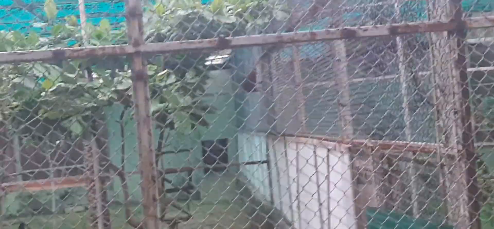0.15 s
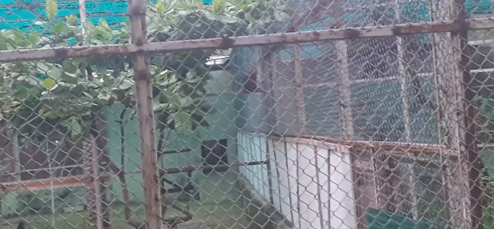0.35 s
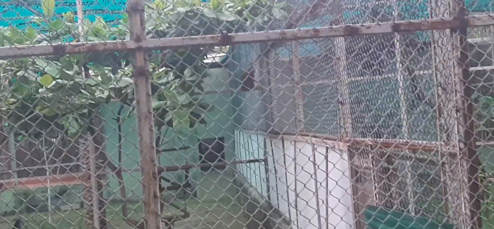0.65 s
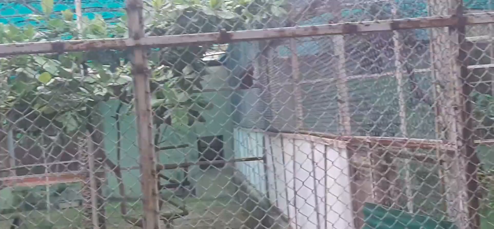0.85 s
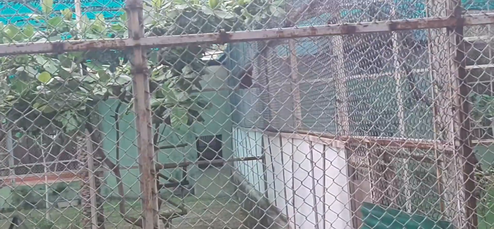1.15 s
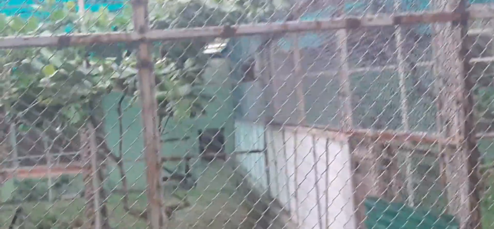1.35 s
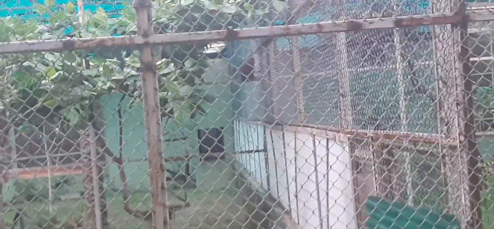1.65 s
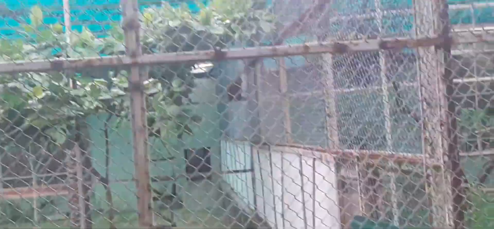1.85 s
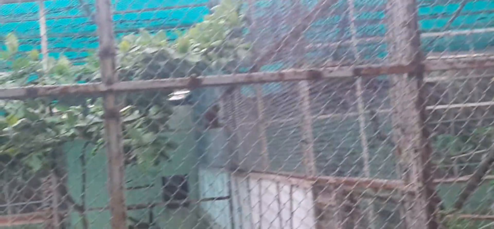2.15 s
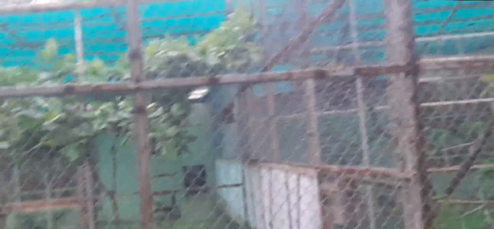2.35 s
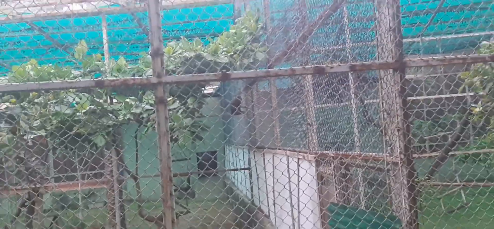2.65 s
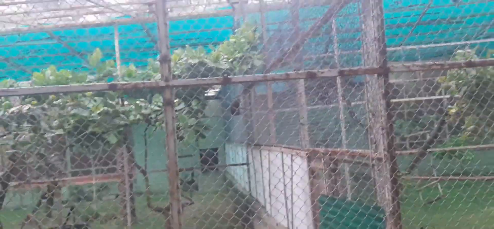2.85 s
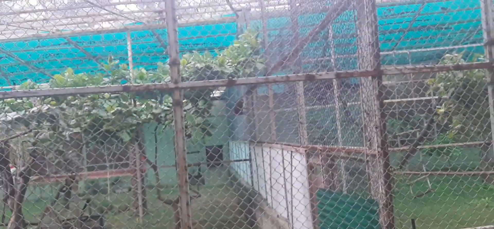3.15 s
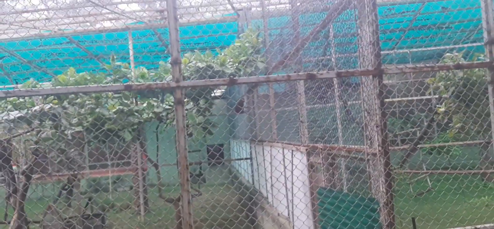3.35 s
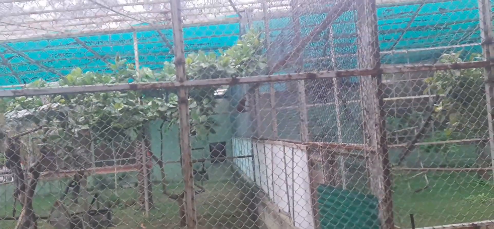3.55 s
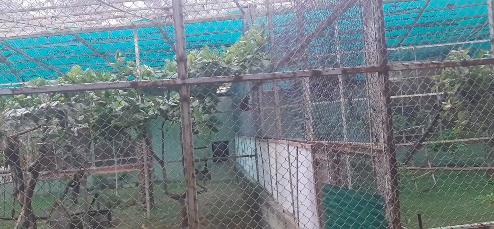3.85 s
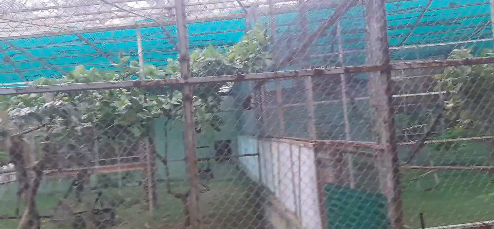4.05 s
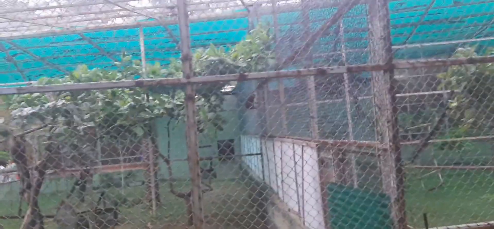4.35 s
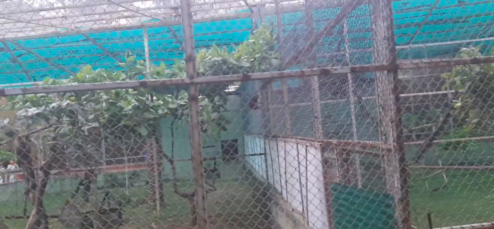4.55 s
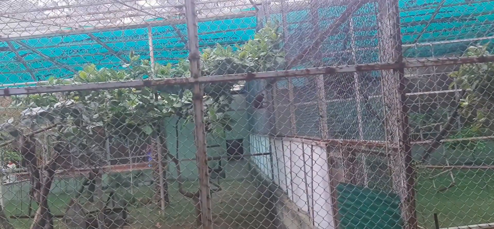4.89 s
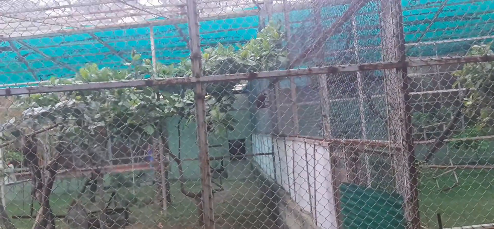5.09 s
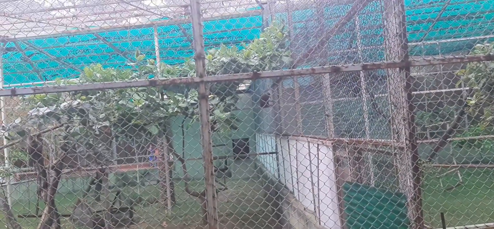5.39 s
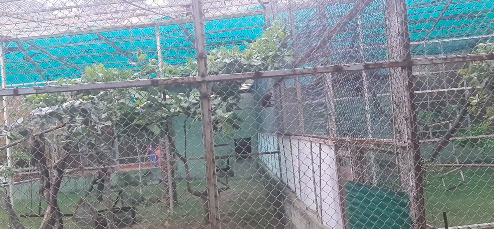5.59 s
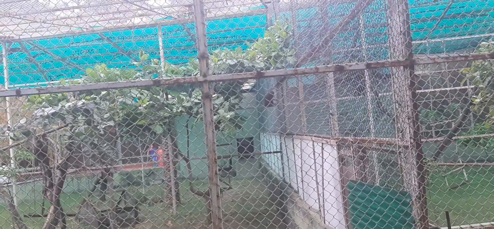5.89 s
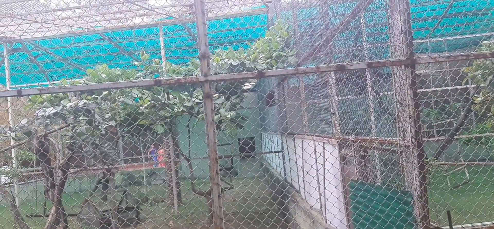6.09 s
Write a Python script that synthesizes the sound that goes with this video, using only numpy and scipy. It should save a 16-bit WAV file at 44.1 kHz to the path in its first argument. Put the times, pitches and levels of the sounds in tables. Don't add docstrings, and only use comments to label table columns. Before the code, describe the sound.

A peafowl close to the microphone in an open wire aviary honks immediately and again soon after, then twice quickly, once more alone, and after a pause in a tight cluster with a last high honk. Between them a neighbour clucks softly, far fowl call faintly, the mesh ticks, leaves rustle and distant traffic hums. The sound is wide, fluttery and slightly smeared.

```python
import sys
import numpy as np
from scipy import signal
from scipy.fft import rfft, irfft
from scipy.io import wavfile
from scipy.ndimage import uniform_filter1d, map_coordinates

SR = 44100
rng = np.random.default_rng(int(sys.argv[2]) if len(sys.argv) > 2 else 0)


def nominal_scale(level):
    x = np.asarray(level, float) / 20
    return 10 ** x


def to_wav(s):
    ch = np.atleast_2d(s).T
    pcm = np.round(np.clip(ch, -1, 1) * 32767)
    wavfile.write(sys.argv[1], SR, pcm.astype(np.int16))


N = 274610


def rms_one(x):
    return x / np.sqrt(np.mean(x ** 2) + 1e-20)


def at_hz(points, hz):
    point_hz, point_db = np.transpose(points)
    return np.interp(np.log(hz), np.log(point_hz), point_db)


def drift(rate_hz, size):
    r = np.exp(-2 * np.pi * rate_hz / SR)
    settle = 9000
    noise = rng.standard_normal(size + settle)
    return rms_one(signal.lfilter([1], [1, -2 * r, r * r], noise)[settle:])


def band(x, low_hz, high_hz):
    return signal.sosfilt(signal.butter(2, [low_hz, high_hz], "band", fs=SR, output="sos"), x)


def coloured(spectrum):
    hz = np.arange(1, N // 2 + 2) * SR / N
    return rms_one(irfft(rfft(rng.standard_normal(N)) * nominal_scale(at_hz(spectrum, hz)), N))


def add(track, s, sound):
    at = max(round(s * SR), 0)
    track[at:at + len(sound)] += sound[:N - at]


def swells(rows, rise_db_per_s, fall_db_per_s, floor_db):
    s, peak_db = np.transpose(rows)[:, :, None]
    hop = 64
    late = np.arange(0, N, hop) / SR - s
    drop_db = np.where(late < 0, -rise_db_per_s, fall_db_per_s) * late
    power = np.sum(nominal_scale(peak_db - drop_db) ** 2, axis=0) + nominal_scale(floor_db) ** 2
    return np.interp(np.arange(N) / hop, np.arange(len(power)), 10 * np.log10(power))


# (frequency [Hz], density [dB per Hz])
AIR_SPECTRUM = [(15, -36.5), (25, -21.5), (102, -2), (152, -15), (351, -13), (512, -12.5), (556, -23),
                (619, -15), (1390, -30), (2200, -24.5), (3670, -37), (4550, -34), (15700, -55.5)]


def air():
    return nominal_scale(-56.5) * coloured(AIR_SPECTRUM)


# (time [s], peak level [dB])
HEAVY_ENGINES = [
    (0.0, -56),
    (2.4, -54),
    (4.4, -52.5),
    (6.1, -56.5),
]


def rumble():
    level_db = swells(HEAVY_ENGINES, rise_db_per_s=7, fall_db_per_s=7, floor_db=-60)
    lumps_db = 2.5 * drift(4, N)
    return nominal_scale(level_db + lumps_db) * rms_one(band(rng.standard_normal(N), 59, 173.3))


# (time [s], peak level [dB])
ROAD_PASSES = [
    (0.0, -47.5),
    (1.5, -56),
    (2.8, -60.5),
    (4.1, -62.5),
    (6.0, -56),
]


def traffic():
    level_db = swells(ROAD_PASSES, rise_db_per_s=31.5, fall_db_per_s=28.5, floor_db=-66.5)
    return nominal_scale(level_db) * rms_one(band(rng.standard_normal(N), 430, 1840))


# (time [s], peak level [dB])
BRIGHT_SWELLS = [(0.0, -38.5), (1.03, -55.5), (1.65, -62), (2.12, -63), (2.78, -60.5), (3.3, -69.5),
                 (3.68, -70), (4.2, -56), (4.9, -57.5), (5.35, -55.5), (6.0, -55)]
STILL_DB = -72.5


def bright_swell_db():
    return swells(BRIGHT_SWELLS, rise_db_per_s=35.5, fall_db_per_s=48, floor_db=STILL_DB)


def bright_noise():
    level_db = bright_swell_db() + 0.9 * drift(6.2, N)
    return nominal_scale(level_db) * rms_one(band(rng.standard_normal((2, N)), 2000, 7650))


def glides(table, wobble, rate_hz):
    out = np.zeros(N)
    for s, length_s, start_hz, end_hz, level_db in table:
        n = round(length_s * SR)
        hz = np.linspace(start_hz, end_hz, n) * (1 + wobble * drift(rate_hz, n))
        tone = np.sin(2 * np.pi * np.cumsum(hz) / SR)
        level = nominal_scale(level_db + 8.5 + 4.8 * drift(20, n))
        add(out, s, level * signal.windows.tukey(n, 0.4) * tone)
    return out


# (time [s], length [s], start [Hz], end [Hz], level [dB])
DISTANT_CALLS = [
    (2.8, 0.28, 642.5, 621, -67),
    (2.96, 0.1, 872, 800, -58.5),
    (5.8, 0.31, 1059, 945, -60),
]


def blurred_calls():
    return glides(DISTANT_CALLS, wobble=0.0686, rate_hz=130)


# (time [s], length [s], start [Hz], end [Hz], level [dB])
BIRD_WHISTLES = [
    (1.15, 0.34, 5100, 4200, -71),
    (2.9, 0.55, 7500, 5830, -67),
]


def whistles():
    return glides(BIRD_WHISTLES, wobble=0.055, rate_hz=150)


# (time [s], length [s], start [Hz], end [Hz], level [dB])
SOFT_CALLS = [
    (1.36, 0.037, 624, 590, -56),
    (3.29, 0.071, 452, 427, -55),
    (4.03, 0.07, 432, 437, -55),
    (4.1, 0.07, 481, 528, -43),
    (4.44, .12, 922, 1015, -37),
]


def far_calls():
    return glides(SOFT_CALLS, wobble=0.012, rate_hz=210)


# (time [s], peak level [dB])
MESH_TICKS = [
    (0.956, -42),
    (2.913, -54),
    (3.646, -41),
    (4.195, -53),
    (4.629, -24.5),
    (5.197, -24),
    (6.157, -45.5),
]


def ticks():
    out, t = np.zeros(N), np.arange(SR // 20) / SR
    for s, peak_db in MESH_TICKS:
        snap = band(rng.standard_normal(len(t)), 8000, 17000)
        add(out, s - 0.002, nominal_scale(peak_db + 1.0 - 60 * t / 0.039) * snap)
    return out


# (time [s], peak level [dB], top resonance against the lowest [dB])
NEIGHBOUR_CLUCKS = [(0.4597, -41.5, -10), (1.5194, -77.5, 15), (2.9001, -50, -3.5), (2.9586, -36, -18.5),
                    (3.372, -38.5, -8), (3.6376, -34.5, -2.5), (3.7625, -38, -12), (3.8919, -34.5, -2),
                    (4.0985, -29.5, -37.5), (4.8491, -39.5, -6), (5.344, -42, -4), (5.7337, -44.5, -7),
                    (5.9687, -43, -1.5)]
# (frequency [Hz], width [Hz], level [dB])
CLUCK_RESONANCES = [(3180, 230, -4.5), (4820, 400, -4.5), (6530, 180, 0.5)]


def clucks():
    out, t = np.zeros(N), np.arange(SR // 3) / SR
    decay = nominal_scale(-60 * t / 0.22) + nominal_scale(-3.0 - 60 * t / 0.76)
    shape = np.minimum(t / 0.0054, 1) * decay
    for s, peak_db, tilt_db in NEIGHBOUR_CLUCKS:
        puff = rng.standard_normal(len(t))
        sound = nominal_scale(4.5 + tilt_db / 2) * band(puff, 3360, 7900)
        for k, (hz, width_hz, level_db) in enumerate(CLUCK_RESONANCES):
            ring = rms_one(band(puff, hz - width_hz / 2, hz + width_hz / 2))
            sound = sound + nominal_scale(level_db + tilt_db * k / 2) * ring
        add(out, s, nominal_scale(peak_db - 11.5) * shape * sound)
    return out


def honk_shape(length_s, climb_s, first_hz, top_hz):
    t = np.arange(round(length_s * SR)) / SR
    left_s = length_s - t
    close_s = min(0.08, 0.4295 * length_s)
    slack = np.clip(1 - t / climb_s, 0, 1) ** 1.4
    shut = np.clip(1 - left_s / close_s, 0, 1)

    hz = top_hz + (first_hz - top_hz) * slack
    hz = hz + (690 - hz) * np.minimum(1.5 * shut, 1)

    attack_db = -31.5
    opening_db = attack_db * np.clip(1 - t / 0.029, 0, 1)
    low_db = attack_db * np.clip(1 - t / 0.016, 0, 1)
    low_db = low_db - 4.5 * (1 - slack) * (1 - shut)
    low_db = low_db - 30.5 * np.clip(1 - left_s / 0.024, 0, 1)
    swell_db = 5.5 + 7 * max(top_hz - first_hz, 0) / 100
    high_db = opening_db - swell_db * slack - 48 * shut ** 1.36
    stopped = np.clip((shut - 0.3) * close_s / 0.039, 0, 1)
    breath_db = opening_db - 2 * slack - 20 * stopped
    return t, hz, low_db, high_db, breath_db


# (time [s], length [s], first pitch [Hz], top pitch [Hz], overtones at full effort [dB])
PEAFOWL_HONKS = [
    (0.0, 0.31, 755, 808.8, -17),
    (0.697, 0.29, 706.5, 828.5, -17),
    (1.626, 0.18, 690, 775.6, -24),
    (1.83, .27, 782, 815, -18.5),
    (2.465, .29, 690, 828.4, -17.5),
    (4.186, .125, 705, 789, -32.5),
    (4.286, 0.172, 622, 703.4, -17),
    (4.449, 0.26, 831.5, 809.7, -16.5),
    (4.968, .27, 675, 877.4, -18),
]
# (fundamental [dB], second partial against the throat [dB], breath [dB],
# thin top of the breath [dB], time to full effort [s])
HONK_BEARING = [(-26.5, 4, -32, -12.5, 0.083), (-30.5, -3.5, -32, -5.5, .19),
                (-23.5, 6.5, -31, -26.5, 0.089), (-23.5, 11.5, -28.5, -43.5, .16),
                (-29.5, 1, -30.5, -25, .21), (-27.5, 7.5, -50.5, -17, 0.087), (-21, 7, -30.5, -23, .08),
                (-28, 8.5, -30.5, -19, 0.12), (-28, 13, -32, -27, .15)]
# (frequency [Hz], level [dB])
THROAT_SPECTRUM = [(1200, -16.5), (1700, -15.5), (2400, -1), (3200, 9.5), (3800, 1), (4300, -11.5),
                   (5000, -6), (5700, -22), (7500, -24.5), (9000, -41)]
# (frequency [Hz], density [dB per Hz])
BREATH_SPECTRUM = [(3500, -29.5), (4700, -12.5), (6000, -4), (7600, -14.5), (8400, -36), (11300, -45.5),
                   (12500, -20.5), (16000, -22.5)]


def honks():
    out, breath = np.zeros((2, N)), coloured(BREATH_SPECTRUM)
    rasp = band(coloured(THROAT_SPECTRUM), 2200, 6000)
    thin = rms_one(band(band(rng.standard_normal(N), 9100, 10000), 9100, 10000))
    pan = nominal_scale(np.array([[-0.75], [0.75]]))
    k = np.arange(2, 14)[:, None]
    for honk, bearing in zip(PEAFOWL_HONKS, HONK_BEARING):
        s, length_s, first_hz, top_hz, full_db = honk
        tone_db, second_db, air_db, thin_db, climb_s = bearing
        t, hz, low_db, high_db, breath_db = honk_shape(length_s, climb_s, first_hz, top_hz)
        n = len(t)
        at = max(round(s * SR), 0)
        span = slice(at, at + n)

        jitter = 0.0057 * drift(90, SR // 2)[:n]
        phase = 2 * np.pi * np.cumsum(hz * (1 + jitter)) / SR
        pulsed = 1 + 0.29 * np.cos(phase)

        weight = nominal_scale(at_hz(THROAT_SPECTRUM, k * hz) + second_db * (k == 2))
        weight /= np.sqrt(np.sum(weight ** 2, axis=0) / 2)
        shimmer = nominal_scale(3.0 * np.array([drift(50, SR // 2)[:n] for _ in k]))
        partials = np.sin(k * phase + rng.uniform(0, 2 * np.pi, k.shape))
        overtones = np.sum(weight * shimmer * partials, axis=0)

        waver_db = 2.0 * drift(6.7, SR // 2)[:n]
        fundamental = nominal_scale(tone_db + low_db + waver_db) * np.sin(phase)
        breathing = pulsed * (breath[span] + nominal_scale(thin_db) * thin[span])
        plain = fundamental + nominal_scale(air_db + breath_db - 4.0) * breathing
        bright = nominal_scale(full_db + high_db) * (overtones + nominal_scale(-22) * pulsed * rasp[span])
        edge = np.clip(np.minimum(t, length_s - t) / 0.031, 0, 1)
        out[:, span] += edge * (plain + pan * bright)
    return out


def yard(x):
    t60_s = 0.44
    t = np.arange(round(t60_s * SR)) / SR
    build_up = np.clip(t / 0.03, 0, 1)
    tail = band(rng.standard_normal(len(t)), 330, 9000) * nominal_scale(-60 * t / t60_s) * build_up
    tail = tail / np.sqrt(np.sum(tail ** 2))
    slap = np.zeros(N)
    add(slap, 0.11, nominal_scale(-29.0) * band(x, 4000, 14000))
    return nominal_scale(-27.5) * signal.fftconvolve(x, tail)[:N] + slap


def scene():
    background = air() + rumble() + traffic() + bright_noise()
    others = blurred_calls() + whistles() + far_calls() + clucks()
    bird = honks()
    return background + ticks() + others + bird + yard(bird.mean(axis=0) + others)


def flutter(dry):
    flutter_hz, depth = 20, 0.0952
    t = np.arange(N) / SR
    bent = t + depth / (2 * np.pi * flutter_hz) * np.sin(2 * np.pi * flutter_hz * t)
    return np.array([map_coordinates(c, [bent * SR], order=3, mode="mirror") for c in dry])


# (time [s], phase [radians])
LEFT_BASS_LEAD = [
    (0, 1),
    (1.7, 3.5),
    (5.0, -0.7),
    (6.23, -3),
]


def wandering_phase(hz, s):
    smear_s, wander_per_s, count = 0.0068, 3.0, 32
    knots = uniform_filter1d(rng.standard_normal((2, len(hz), 40)), count, axis=1)
    knots = knots * count * np.sqrt(2) * np.pi * hz[1] * smear_s
    place = np.meshgrid(np.arange(len(hz)), s * wander_per_s, indexing="ij")
    left, right = [map_coordinates(knot, place, order=1) for knot in knots]
    bass = np.exp(-(hz[:, None] / 110) ** 2)
    lead = np.interp(s, *np.transpose(LEFT_BASS_LEAD))
    return np.array([left * (1 - bass) + lead * bass, right * (1 - bass)])


def smear(x):
    hz, s, bands = signal.stft(x, SR, nperseg=2048, noverlap=1792)
    bands = bands * np.exp(1j * wandering_phase(hz, s)) * (hz < 15850)[:, None]
    return signal.istft(bands, SR, nperseg=2048, noverlap=1792)[1][:, :N]


def top_hiss():
    level_db = -76 + 0.42 * (bright_swell_db() - STILL_DB)
    return nominal_scale(level_db) * rms_one(band(rng.standard_normal((2, N)), 12300, 15800))


def low_pass(x):
    return signal.sosfilt(signal.butter(12, 15890, fs=SR, output="sos"), x)


def record(dry):
    out = nominal_scale(2.5) * smear(flutter(dry)) + top_hiss()
    limit = 0.9
    rounded = out / (1 + (out / limit) ** 8) ** (1 / 8)
    return low_pass(rounded)


dry = scene()
out = record(dry)
to_wav(out)
```